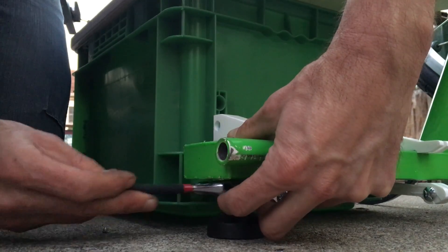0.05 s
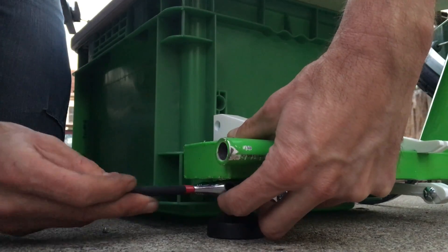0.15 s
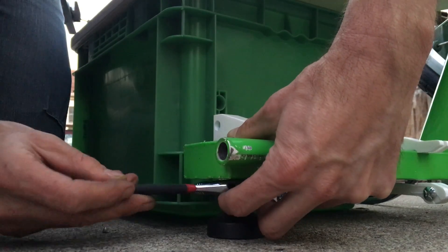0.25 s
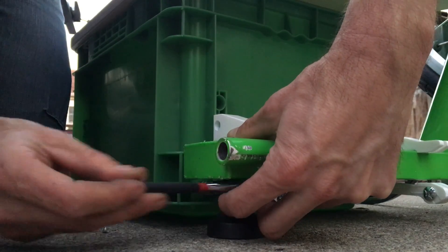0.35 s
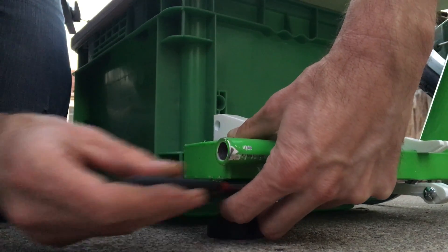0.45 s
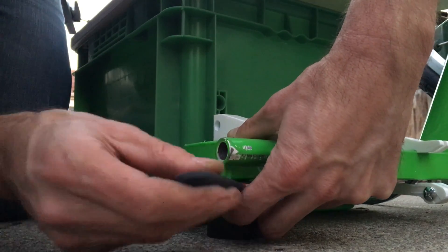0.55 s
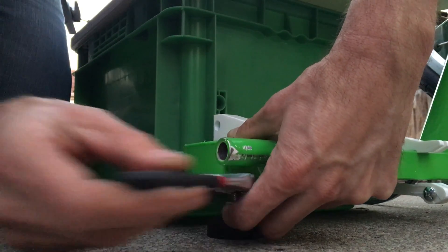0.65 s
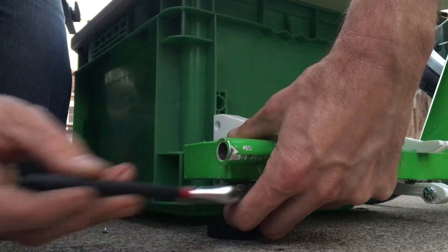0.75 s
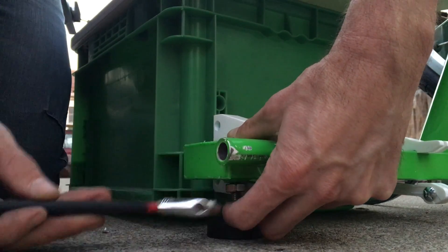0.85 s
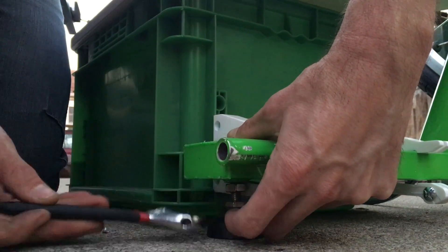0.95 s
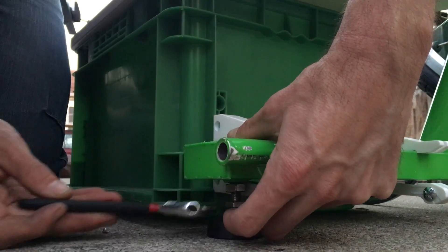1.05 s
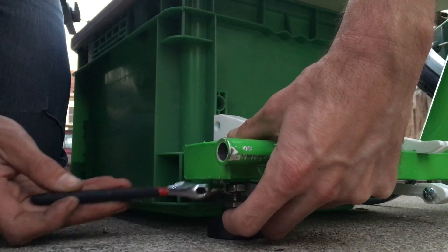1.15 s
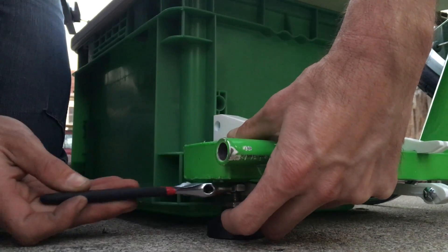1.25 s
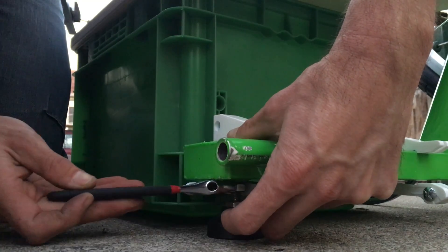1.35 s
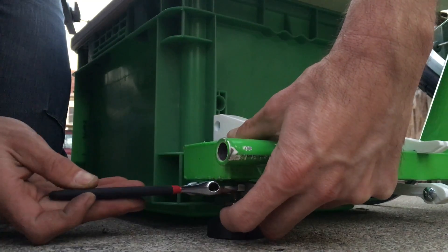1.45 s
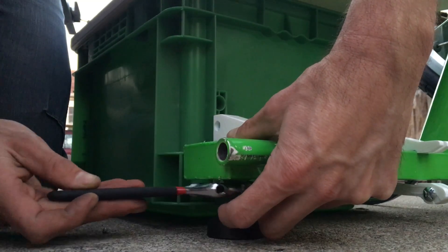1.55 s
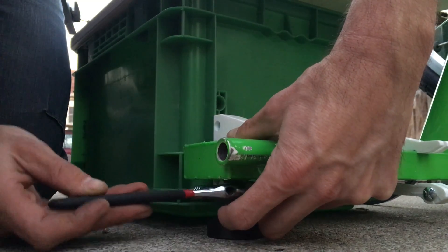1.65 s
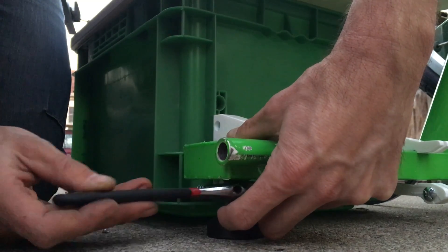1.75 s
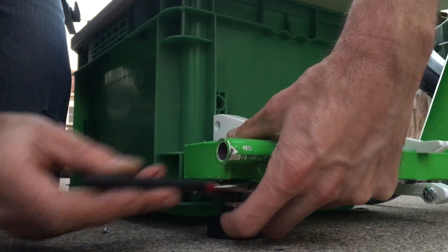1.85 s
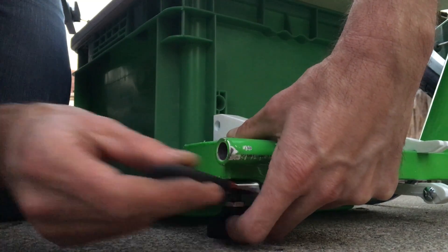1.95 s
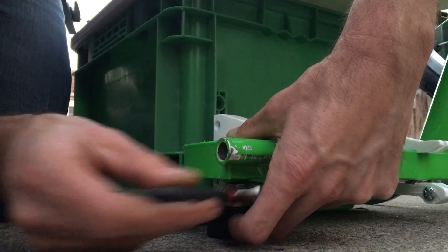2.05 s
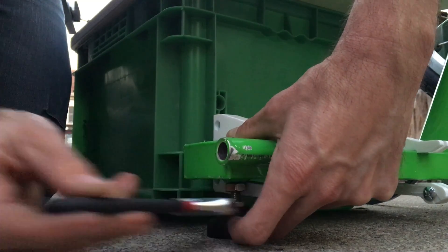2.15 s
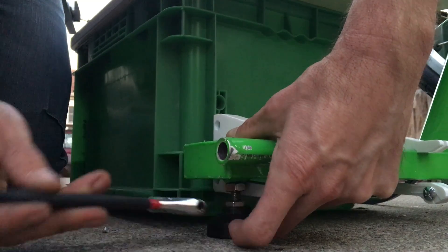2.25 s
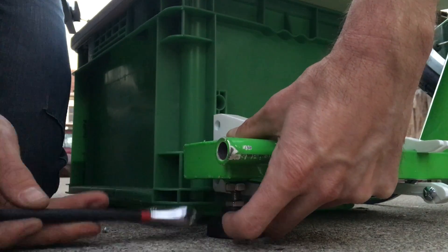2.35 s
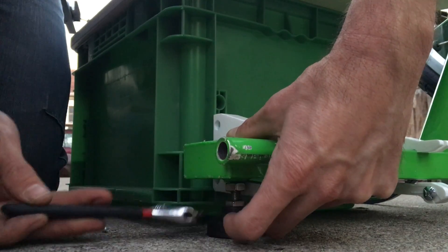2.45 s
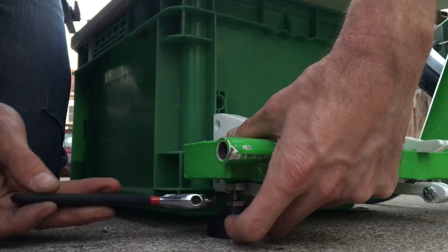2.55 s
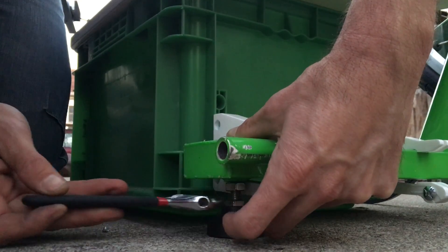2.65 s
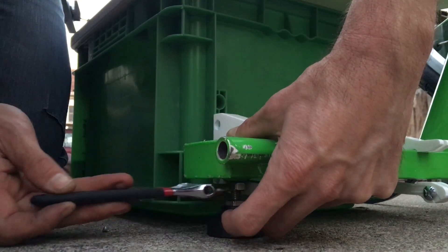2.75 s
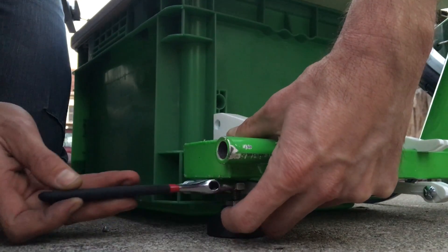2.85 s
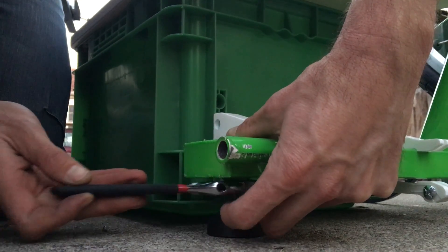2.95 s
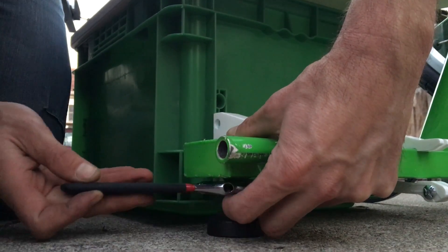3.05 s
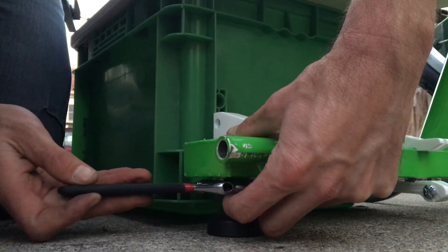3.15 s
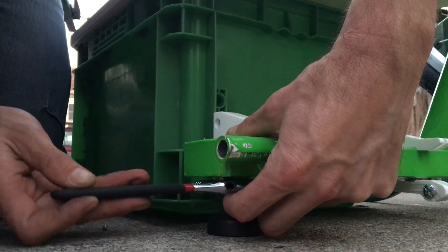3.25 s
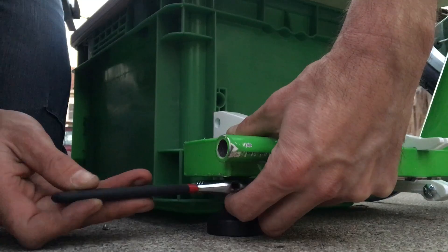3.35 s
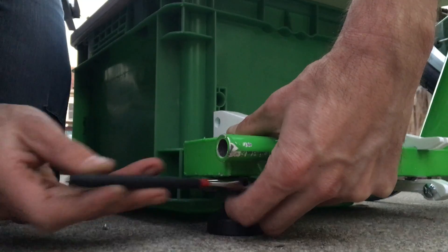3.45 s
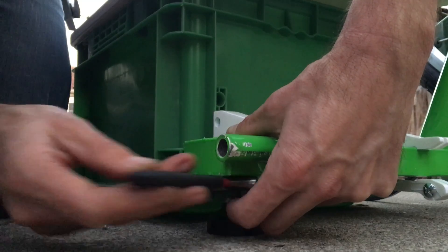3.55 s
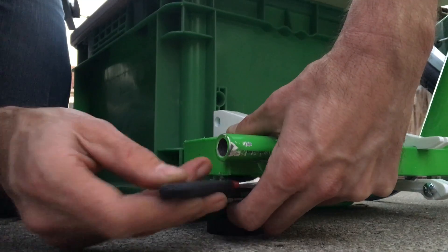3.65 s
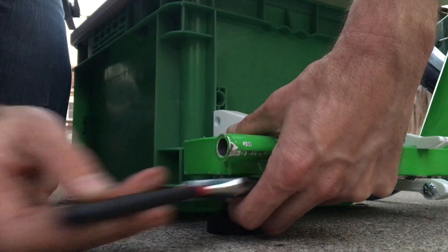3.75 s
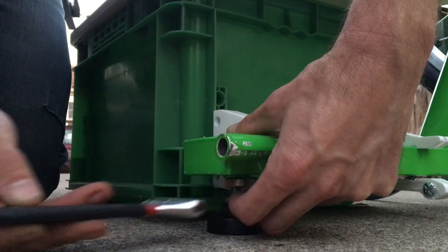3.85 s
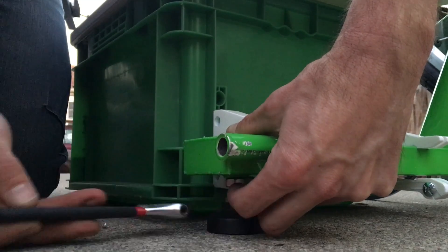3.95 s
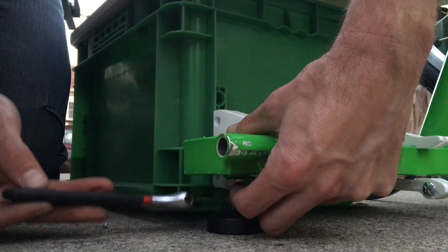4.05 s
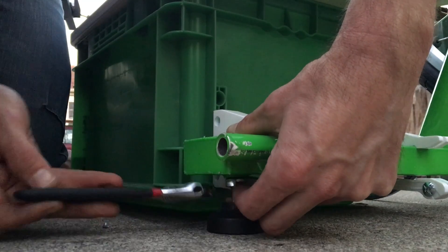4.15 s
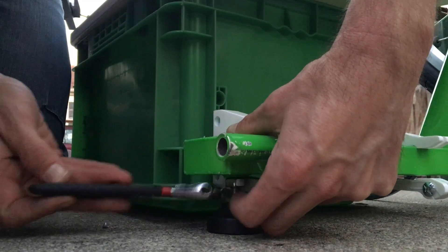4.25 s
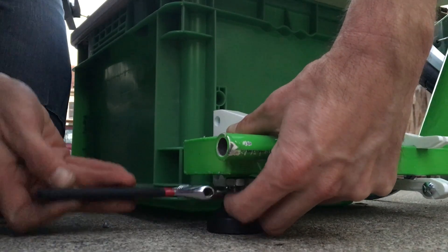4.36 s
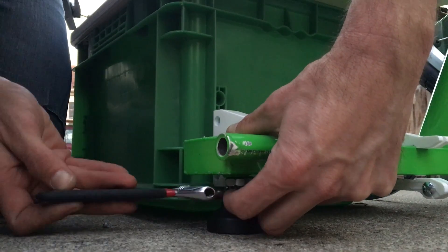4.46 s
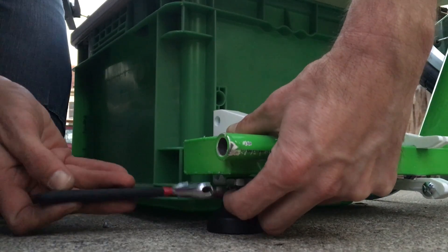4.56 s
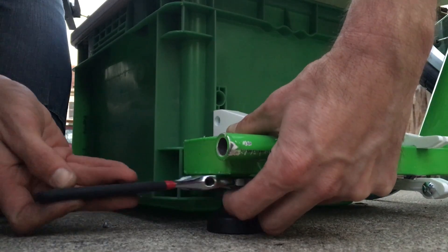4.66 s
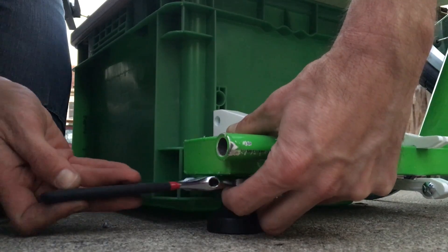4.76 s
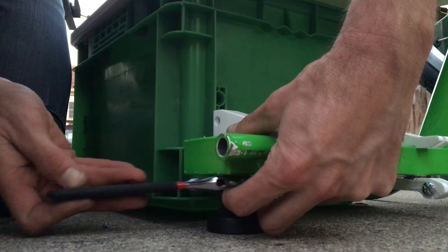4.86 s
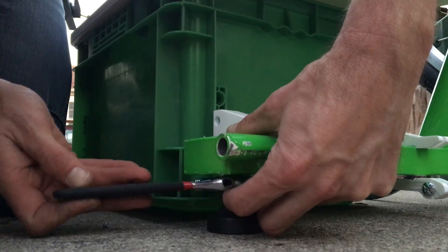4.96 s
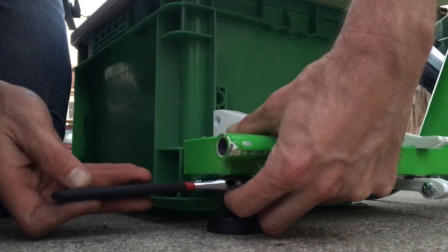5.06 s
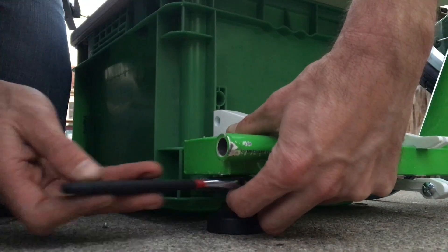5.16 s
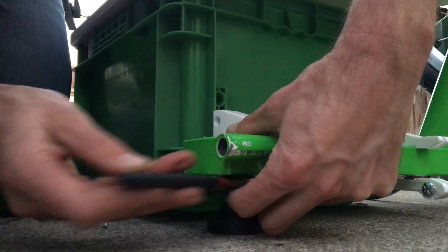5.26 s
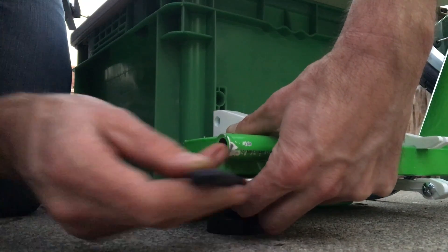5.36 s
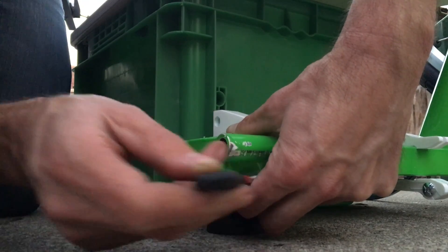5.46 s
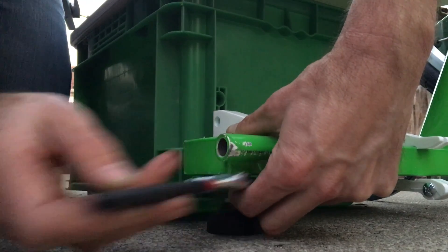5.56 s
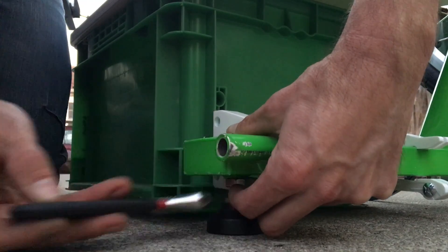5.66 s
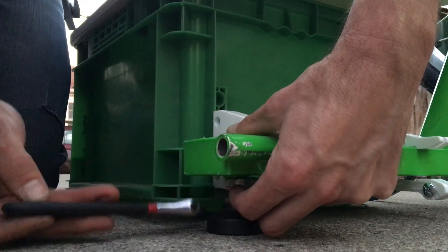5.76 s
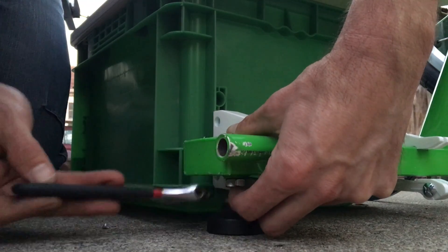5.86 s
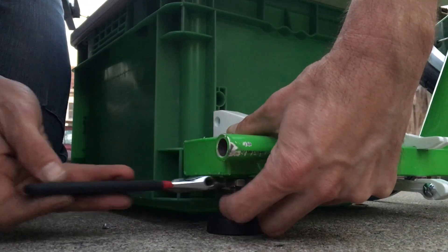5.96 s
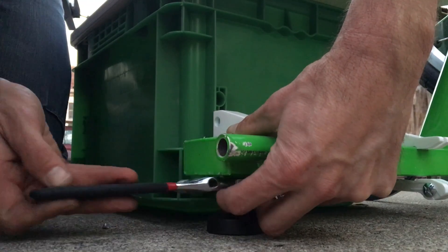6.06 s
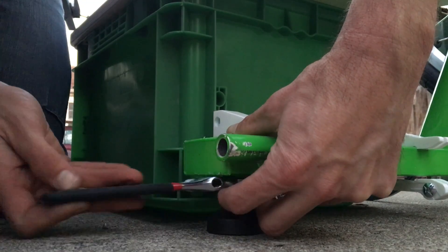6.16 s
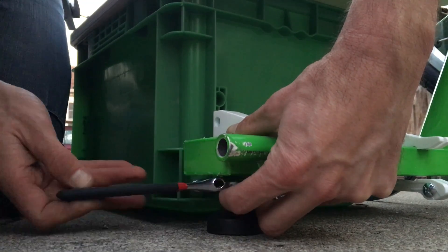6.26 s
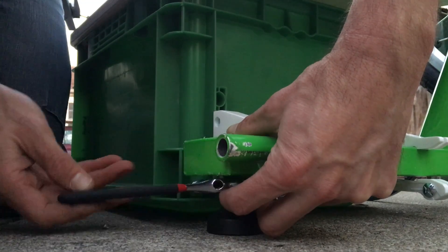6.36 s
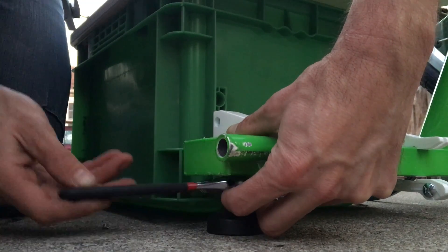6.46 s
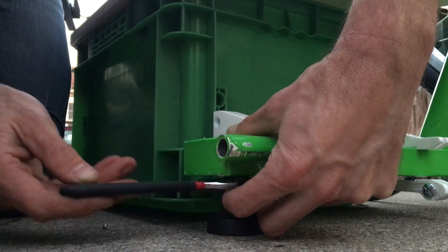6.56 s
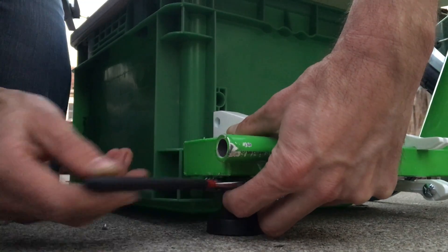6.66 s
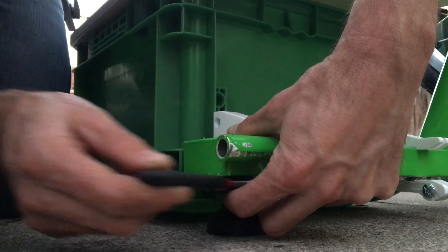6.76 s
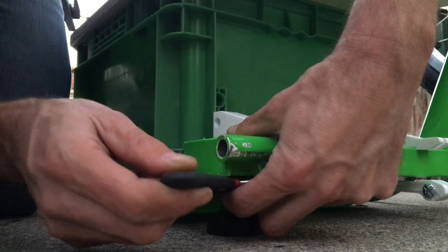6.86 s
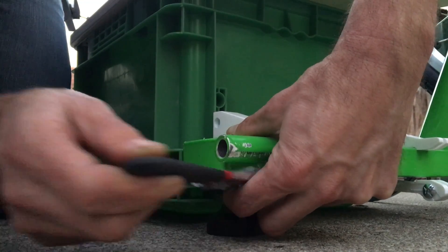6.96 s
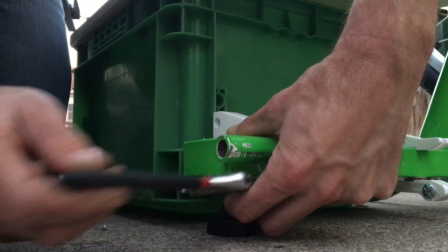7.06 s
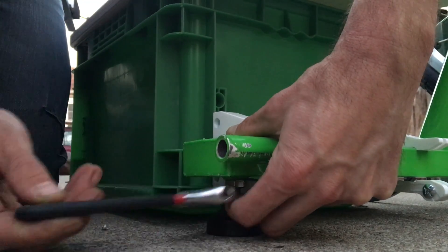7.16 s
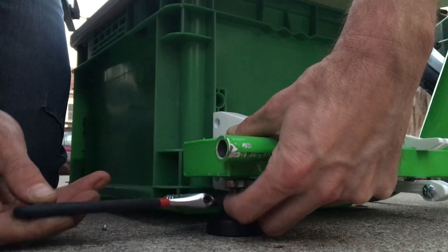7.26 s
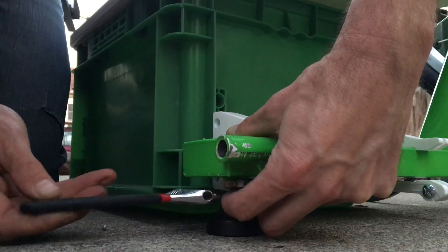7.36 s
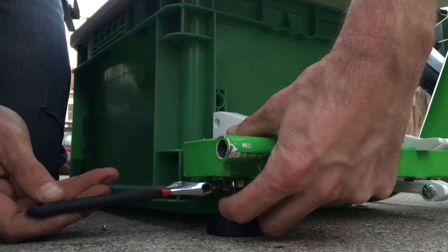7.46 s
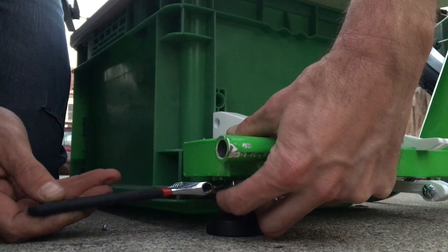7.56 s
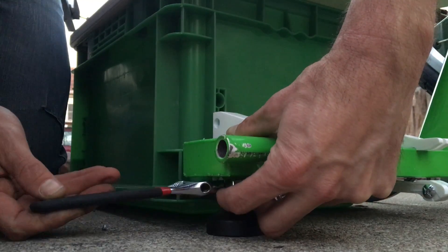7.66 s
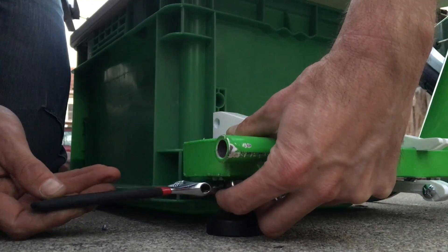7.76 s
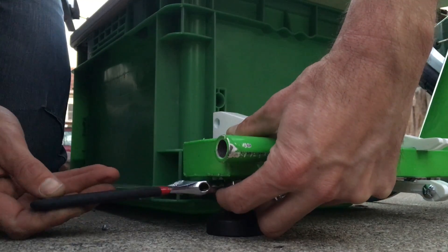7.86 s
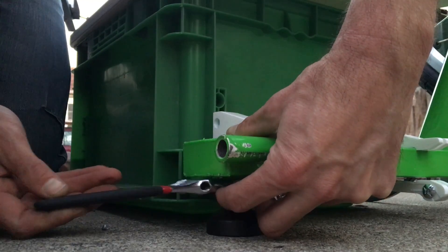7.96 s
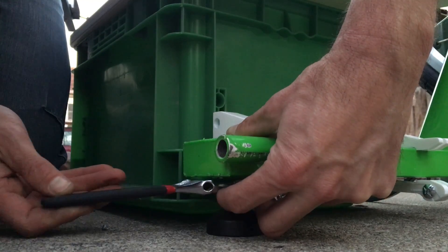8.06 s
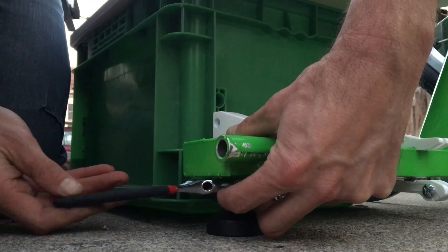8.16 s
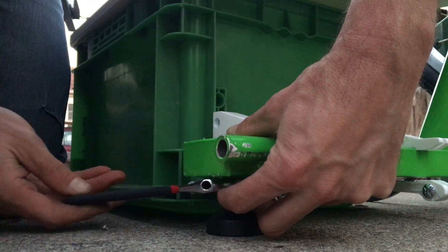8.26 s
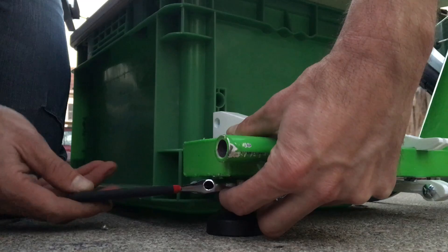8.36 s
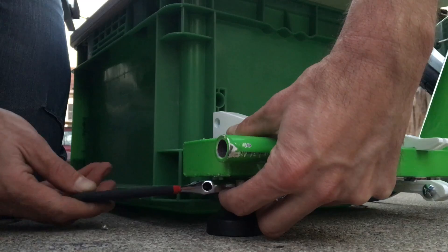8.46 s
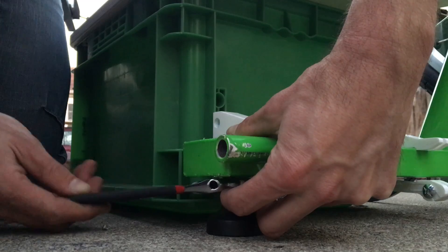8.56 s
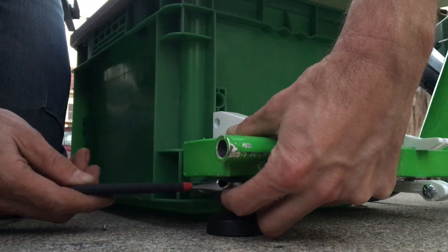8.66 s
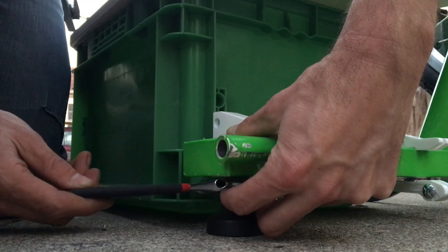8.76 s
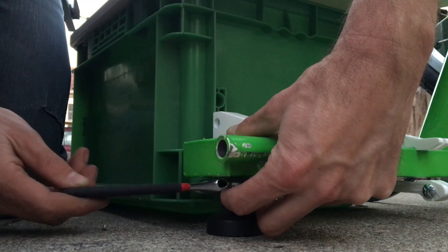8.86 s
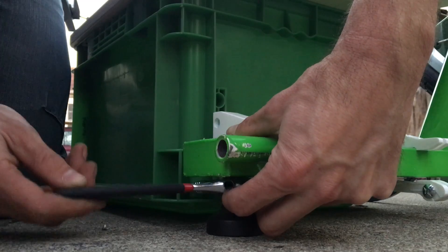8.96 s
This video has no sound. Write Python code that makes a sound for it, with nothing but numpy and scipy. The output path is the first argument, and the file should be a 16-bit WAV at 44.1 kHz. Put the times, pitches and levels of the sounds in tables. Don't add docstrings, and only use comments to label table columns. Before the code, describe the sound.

Outdoors, close and dry, a steel wrench tightens a nut under a metal frame by a hollow plastic crate. Low distant engine drone, soft tyre rush and faint hiss run throughout, the hum swelling slightly around 4.4 and 6-7 s. A light tap and scrape at 0.1 s, then a hard clank at 0.73. Small clicks and rattles at 1.3-1.4, a clack at 1.98, a soft knock and quiet handle rubbing. Clanks and scraping at 2.9-3.3, a tap at 3.57, a sharp clack at 3.78. Metallic tube hits at 4.4-4.5, a hollow clank at 4.7, taps around 5.4. A very loud clack at 6.01 with rattling after, another at 6.55, then the strongest double clank at 6.96-7.05 with boxy crate thump. A skin brush at 7.3, lighter clicks at 7.6 and 8.07-8.4, and small scrapes and ticks near 8.7, ending at about 9 s.

```python
import sys
import numpy as np
from scipy import signal
from scipy.fft import rfft, irfft, next_fast_len
from scipy.io import wavfile
from scipy.ndimage import uniform_filter1d, map_coordinates

SR = 44100
rng = np.random.default_rng(int(sys.argv[2]) if len(sys.argv) > 2 else 0)


def wav_out(sig):
    wavfile.write(sys.argv[1], SR, np.round(np.clip(np.atleast_2d(sig).T, -1, 1) * 32767).astype(np.int16))


def ratio_of_db(decibels):
    return 10 ** (np.asarray(decibels, float) / 20)


N = 397341

RING = 6144
WANDER = 0.012

# time_s, drone_level_db, rush_level_db, firing_pitch_hz
ENGINES = [(0.0, -50, -59.5, 118), (2.2, -47, -58, 112), (3.1, -50, -56.5, 110), (3.76, -46.5, -56.5, 114),
           (4.4, -40, -56, 120), (5.14, -45, -59, 112), (6.1, -42, -57, 106), (6.8, -42, -60, 104),
           (7.3, -47.5, -58, 103), (8.16, -49.5, -57, 100), (9.01, -49, -60, 100)]
# frequency_hz, level_db (per Hz)
TRAFFIC_SPECTRUM = [(15, -40.5), (25, -6), (74, 2.5), (124, 4.5), (177, -3), (266, -12), (457, -23.5),
                    (687, -23), (979, -25.5), (1930, -36.5), (2820, -44.5), (10400, -56.5), (12600, -53),
                    (15200, -68.5), (16500, -80.5)]
RUMBLE_DB, RUMBLE_YIELDS = -45, 0.22

# pitch_hz, level_db, t60_s
WRENCH_MODES = [(2570, -13.5, 0.11), (2970, -15.5, 0.1), (8457, -14, 0.033), (3330, -18, 0.055),
                (8800, -15.5, 0.043), (3570, -5.5, 0.13), (4140, -6.5, 0.053), (3970, -10, 0.05),
                (4333, -3, 0.031), (4746, -7, 0.023), (4570, -6.5, 0.081), (5200, -10, 0.032),
                (5750, -10.5, 0.072), (5720, -10, 0.11), (6000, -17.5, .06), (6640, -7.5, 0.061),
                (7540, -13, 0.06)]
FRAME_MODES = [(1199, -18, 0.21), (1312, -12.5, 0.065), (1544, 0.5, 0.012), (1684, -8, 0.069),
               (1746, -2.5, 0.035), (1970, -14.5, 0.066), (2277, -11, 0.045), (2900, -13.5, 0.017)]
TUBE_MODES = [(1419, 4.5, 0.11), (1355, -3.5, 0.048)]
LID_MODES = [(533, -2, 0.069), (590.5, -2, 0.2), (669.4, -0.5, 0.094), (653.4, -4.5, 0.12),
             (838, -9.5, 0.096), (949, -2, 0.066), (1034.5, -8, 0.14)]
CRATE_MODES = [(164, -14.5, 0.13), (192.2, -8, 0.19), (248, 6, 0.14), (280, -1.5, 0.1), (333.3, -3.5, 0.16),
               (367.8, -13.5, 0.17), (394.4, -6.5, 0.15)]

# frequency_hz, level_db
WRENCH_DENSE = [(1000, -40.5), (2300, -3), (4000, 4), (6500, 2), (8000, -12), (16000, -27.5)]
EDGE_TICK = [(3000, -57), (6000, -25.5), (8500, 2.5), (10500, -2.5), (12500, -1), (16000, -16)]
FRAME_DENSE = [(200, -67), (800, 1), (1150, -5.5), (1750, 0), (2400, -17.5), (3200, -22), (7000, -65.5)]
CRATE_DENSE = [(60, -52), (170, 0), (300, 0.5), (450, -10), (700, -10.5), (1500, -44.5), (4000, -90.5)]
# frequency_hz, level_db
HEAVY_BODY = [(2500, -7), (5000, -17.5), (16000, -60.5)]

# start_s, length_s, jaw_drag_level_db, skin_hiss_level_db, crate_level_db
TURNS = [(-.05, 0.29, -80, -79, -44.5), (.36, 0.46, -67.5, -79, -58.5), (1.56, 0.19, -74, -83, -46),
         (1.8, 0.33, -70.5, -87.5, -76), (2.99, 0.21, -69, -81, -46), (3.28, 0.19, -72, -79, -63),
         (3.55, 0.38, -66.5, -81.5, -66), (4.22, 0.22, -67, -82, -53), (4.4, 0.39, -66, -73.5, -58.5),
         (4.92, .12, -68, -81, -55), (5.08, 0.26, -66.5, -76, -50), (5.34, 0.25, -63, -72, -34),
         (6.08, 0.37, -71, -90, -38.5), (6.55, 0.38, -67.5, -81, -35.5), (7.06, 0.38, -68, -74, -45.5),
         (7.68, 0.2, -72, -87.5, -40.5), (8.33, 0.11, -82, -88, -38.5), (8.8, 0.24, -84, -86, -45)]
# start_s, length_s, wrench_level_db, frame_level_db, crate_level_db
SCRAPES = [(0.097, 0.084, -49, -40.5, -40), (0.566, 0.05, -85, -67, -43.5), (1.293, 0.21, -66, -56, -46.5),
           (1.662, 0.067, -58, -59, -41.5), (2.89, 0.057, -54, -38, -48), (2.96, 0.075, -69, -59, -55),
           (3.07, 0.066, -47, -50, -48), (4.936, 0.084, -81, -49, -43), (5.439, 0.034, -47, -36.5, -47),
           (5.989, 0.016, -59, -59, -49), (6.261, 0.067, -66, -51.5, -71.5),
           (6.512, 0.03, -49.5, -41.5, -33), (6.953, 0.059, -48.5, -51, -27.5), (4.6, 0.023, -84, -59, -57),
           (8.646, 0.12, -62.5, -66.5, -57), (8.64, 0.11, -74, -66, -39.5), (8.688, 0.022, -65, -58, -64.5),
           (8.74, 0.0084, -59, -53, -35.5), (8.765, 0.011, -66.5, -54.5, -41), (1.36, 0.038, -52, -47, -53),
           (3.03, 0.14, -71, -50, -60), (6.965, 0.1, -50.5, -52.5, -33), (0.74, 0.017, -65, -59, -44),
           (4.39, 0.042, -62, -67, -38.5), (8.37, 0.032, -71.5, -56, -52.5)]
REST_JAWS_DB, REST_SKIN_DB, REST_CRATE_DB = -79.5, -85, -58
DRAG_FRAME_DB = 4
# frequency_hz, level_db
PALM_SPECTRUM = [(5000, -20.5), (8000, -4.5), (10500, -3), (13000, -8.5), (16000, -10)]

# start_s, pitch_hz, peak_level_db, t60_s
LOW_SPOTS = [(0.505, 604, -39, .1), (0.607, 904, -32, .05), (1.287, 829, -49, .08), (1.288, 597, -29.5, .3),
             (1.340, 587, -34.5, .4), (1.397, 579, -30, .15), (1.429, 991, -34, .08),
             (2.050, 829, -38.5, .08), (2.885, 663, -22.5, .08), (2.945, 584, -29, .2),
             (3.140, 380, -28, .1), (3.317, 990, -32, .06), (3.572, 904, -25.5, .06),
             (3.778, 880, -10, .025), (4.72, 323.7, -19.5, .12), (4.719, 601, -27, .12),
             (5.388, 840, -27, .08), (5.388, 587, -32, .1), (5.522, 322, -21.5, .12),
             (5.521, 920, -29.5, .08), (6.015, 341, -24, .12), (6.017, 575, -22.5, .2),
             (6.014, 970, -28, .08), (6.082, 386, -38.5, .12), (6.083, 915, -30.5, .06),
             (6.178, 656.6, -24, .1), (6.193, 578.7, -27.5, .12), (6.295, 996, -39, .07),
             (6.325, 680, -37, .15), (6.525, 666, -30, .15), (6.961, 800, -23, .07),
             (7.009, 310, -13.5, .12), (7.008, 900, -17, .07), (7.047, 237, -21, .14),
             (7.585, 609, -32.5, .1), (7.585, 1000, -29, .07), (7.616, 398, -32.5, .1),
             (7.616, 926, -34.5, .07), (0.733, 387, -26.5, 0.14), (4.384, 392, -21, .1),
             (4.512, 591, -27, 0.14), (4.602, 580, -42, .15), (4.850, 584, -37, .12),
             (8.392, 686, -40, 0.13), (8.744, 683, -34.5, .08), (8.220, 251, -20.5, .12)]
# start_s, pitch_hz, peak_level_db, t60_s
HIGH_SPOTS = [(0.732, 1680, -11.5, 0.028), (1.286, 2270, -26, 0.06), (1.287, 1355, -38, 0.11),
              (1.400, 1407, -33, 0.16), (1.429, 4800, -34, 0.071), (1.979, 1790, -21, 0.05),
              (1.979, 4129, -22.5, 0.047), (2.885, 1306, -29, 0.076), (3.031, 1418, -52, .5),
              (3.141, 5820, -42.5, 0.09), (0.650, 5900, -40.5, .07), (3.573, 2370, -37, 0.055),
              (3.779, 4300, -45.5, 0.26), (3.775, 4560, -22.5, .05), (3.776, 8457, -34, .067),
              (4.507, 1920, -26.5, 0.06), (4.719, 1750, -22, 0.029), (6.014, 1768, -15, 0.053),
              (6.012, 4140, -16.5, 0.055), (6.014, 3583, -29, 0.11), (6.083, 1680, -31.5, .06),
              (8.069, 5580, -38, 0.098), (6.083, 3640, -42.5, 0.14), (6.195, 1970, -41, 0.16),
              (6.199, 1425, -51.5, 0.35), (6.295, 5950, -28.5, 0.05), (8.069, 8800, -31, 0.034),
              (6.330, 1676, -31.5, 0.074), (6.551, 1420, -21, 0.12), (6.552, 1697, -24, 0.055),
              (6.552, 3560, -34.5, 0.12), (6.961, 4330, -13, 0.046), (6.961, 4620, -17, 0.053),
              (7.009, 2400, -20, 0.062), (7.049, 1680, -24, 0.056), (7.585, 1805, -22.5, .05),
              (7.615, 2760, -30.5, 0.064), (8.069, 2004, -32, 0.06), (8.392, 3600, -41, 0.062),
              (4.378, 1660, -28, .05), (4.655, 1950, -47, 0.073), (4.719, 2570, -38, 0.15),
              (8.069, 2920, -54, .25), (8.148, 4510, -40, 0.042), (8.220, 2720, -35, 0.03),
              (2.050, 2220, -37, 0.064), (8.100, 1430, -55, 0.37), (6.016, 2570, -28.5, 0.17),
              (6.961, 8500, -21.5, .05),
              (0.142, 3601, -28, 0.052), (0.732, 3790, -23, .05), (0.732, 5850, -30, 0.057),
             (1.979, 2277, -28.5, .06), (2.885, 4802, -25, 0.054), (3.297, 6420, -38.5, .05),
             (4.378, 1965, -37.5, .15), (4.378, 3090, -24.5, 0.069), (5.453, 4800, -30, 0.065),
             (6.014, 4510, -25.5, .06), (6.014, 6503, -25, 0.043), (6.961, 5300, -28.5, .05),
             (7.008, 2680, -25.5, 0.057), (3.776, 5604, -34, 0.071), (0.105, 1418, -37, 0.32)]

# start_s, wrench_peak_level_db, then over the wrench crate_db, tube_db, edge_db
TUBE_HITS = [(0.1416, -27, 5.5, -2, -39), (1.315, -39, 10.5, 9, -8), (1.3965, -51, 25, 17.5, -20),
             (2.9406, -29.5, 1, -1.5, -10.5), (3.5721, -30, -23, -4.5, -16), (4.3773, -16, -5.5, 3.5, -4),
             (4.5047, -26.5, -4, -6.5, -4), (4.8232, -45, 17.5, 5.5, -1), (4.842, -35.5, -8, -7, -24),
             (4.9754, -39.5, 2, 0.5, -27), (5.386, -32.5, 1.5, -4, -34), (6.0814, -24, -1.5, -5.5, -17),
             (6.1924, -29, 2, -1, -7), (6.283, -37.5, -24.5, 0, -26), (6.2944, -25.5, -10.5, -25, -13.5),
             (6.329, -35, -3.5, -5, -20), (7.584, -40, 17.5, 15, -21.5), (8.0687, -24, 3.5, 3.5, -2.5),
             (8.2181, -41.5, 15, 2.5, -10), (8.3923, -32.5, 0, -9, -46)]
# start_s, wrench_peak_level_db, then over the wrench crate_db, frame_db, tube_db
KNOCKS = [(0.5054, -57, 19.3, 17.5, 1), (0.6098, -64.5, 35, 11, -21), (2.05, -52.5, 21.7, 19.5, -11),
          (3.032, -46.5, 2.6, -3, 2), (3.2617, -56, 22.3, 10.5, 15), (3.633, -53.5, 13, 18, -2),
          (4.655, -54.5, 4, 7, 13), (5.3414, -56, 22, 19.5, -16), (6.6422, -50, 8.5, 6, -5.5),
          (6.824, -77.5, 44, 6, 10), (7.8078, -50, 19, 11, 10), (7.8812, -59, 16, 10, 9.5),
          (7.964, -48.5, 11, 3, 4.5), (8.2919, -58.5, 12, -13.5, 13.5), (8.3087, -50.5, 12.6, -8, 5),
          (8.6013, -60, 21, -7, -5.5), (8.991, -72, 36, 9, -9.5)]
# start_s, wrench_peak_level_db, then over the wrench crate_db, frame_db, edge_db
CLANKS = [(0.6404, -31, 1.5, -10.5, -7), (0.7318, -15.5, -1.5, -6.5, -5), (1.286, -28, -6, -0.5, -17),
          (1.4292, -27, -0.5, -10, -18), (1.9786, -19.5, -3.5, -3, -16), (2.8847, -21, -5, -3.5, -7.5),
          (3.1109, -35, 3.5, -3.5, -30), (3.14, -30, -1, 4.5, -16), (3.296, -32, -2.5, -14.5, -21),
          (3.7755, -13, -13.5, -12, -17), (4.327, -35.5, 13.5, -13, -10), (4.7182, -19.5, -7.5, -1.5, -16),
          (5.442, -36, 8, -6, -14), (5.452, -23.5, -1.5, -16, -5.5), (5.52, -30, -7, 3, -36),
          (6.0135, -5.5, -19.5, -14, -37.5), (6.176, -22.5, -6.5, -7.5, -15), (6.551, -12, -3.5, -9.5, -11),
          (6.5897, -37, 10, 5, -17), (6.9602, -4.5, -15.5, -14, -11.5), (7.0063, -12, -15, -3.5, -22.5),
          (7.0465, -29, 6.5, -1, -4.5), (7.616, -31, 1, 2.5, -25), (8.147, -38.5, 1.5, -3.5, -33)]
# start_s, wrench_peak_level_db, then over the wrench bodies_db, edge_db
TICKS = [(0.938, -70, 4, 15), (0.648, -39, -17, -11), (1.4, -44, -10, -3), (1.419, -48.5, -10, -9),
         (6.945, -51.5, -10.5, -8), (8.649, -54, -5, -29), (1.34, -43, 0, -20), (1.3708, -45, 7, -17),
         (1.703, -45.5, 6.5, -11), (2.138, -54, 10.5, -16), (3.001, -53, -1, -22), (3.073, -60, 9, -17),
         (3.412, -54, -14, 1), (4.993, -39.5, -14, -20), (6.236, -44.5, 6.5, -23), (6.259, -45, -14, -23),
         (6.535, -28.5, -15, -21), (6.8685, -48.5, 6.5, -10), (7.303, -33.5, -15, -5),
         (8.665, -51, 12, -29), (8.722, -48.5, -11, -18)]
CLANK_TUBE_DB, HIT_FRAME_DB = -11.5, -1
TICK_FRAME_DB, TICK_TUBE_DB, KNOCK_EDGE_DB = -11.5, -14, -19
# start_s, level_db
LID_CHANGES = [(0.7316, -17), (3.1104, -6), (6.551, -7), (7.0475, -10.5), (1.9787, -5), (3.7752, -10.5),
               (8.0687, -1), (4.3776, -4.5), (7.584, 0.5), (5.452, -13), (8.2186, 4.5)]

# start_s, length_s, level_db
BRUSHES = [
    (1.084, 0.031, -68),
    (1.809, 0.089, -63.5),
    (2.157, 0.09, -63.5),
    (2.255, 0.011, -69),
    (2.54, 0.037, -67.5),
    (3.873, 0.037, -65),
    (4.02, 0.075, -60),
    (5.814, 0.065, -61),
    (6.895, 0.0083, -65),
    (7.287, 0.049, -50),
]
# frequency_hz, level_db (per Hz)
SKIN_SPECTRUM = [(1470, -20), (2500, -4.5), (3080, -8), (6060, -10), (8600, -13), (12900, -8.5),
                 (16000, -16)]
# frequency_hz, level_db
MICROPHONE = [(20, -19.5), (40, 0.5), (9600, -2.5), (10500, -8.5), (11500, -2.5), (15500, -3), (16400, -11),
              (17000, -48)]


def unit(x):
    return x / np.sqrt(np.mean(x ** 2) + 1e-20)


def peak_one(x):
    return x / (np.abs(x).max(axis=-1, keepdims=True) + 1e-12)


def curves(rows):
    s, *cols = np.transpose(rows)
    return [np.interp(np.arange(N) / SR, s, c) for c in cols]


def coloured(x, points):
    m = next_fast_len(x.shape[-1])
    hz, db = np.transpose(points)
    log_bins = np.log(np.fft.rfftfreq(m, 1 / SR) + 1)
    gain = ratio_of_db(np.interp(log_bins, np.log(hz), db))
    return irfft(rfft(x, m) * gain, m)[..., :x.shape[-1]]


def wobble(rate):
    knots = rng.standard_normal(int(N * rate / SR) + 4)
    return map_coordinates(knots, [np.arange(N) * rate / SR])


def stroke(s, length):
    t = np.arange(N) / SR
    return np.exp(-((t - s - length / 2) / (length / 2)) ** 4)


def pressed(rows):
    return sum(ratio_of_db(np.array(row[2:]))[:, None] * stroke(*row[:2]) for row in rows)


def swell(t, rise):
    return 1 - np.exp(-(t / rise) ** 2)


def smooth_rows(count, size):
    return unit(uniform_filter1d(rng.standard_normal((count, RING)), size=size, axis=1))


def ringing(modes, count, spread_db, rise):
    hz, db, t60 = np.transpose(modes)[:, :, None]
    t = np.arange(RING) / SR
    wander = WANDER * hz / SR * np.cumsum(smooth_rows(len(modes), size=150), axis=1)
    decay = ratio_of_db(db - 60 * t / t60)
    shapes = decay * np.sin(2 * np.pi * (hz * t + wander)) * swell(t, rise)
    draw = rng.standard_normal((count, 2, len(modes)))
    strengths = np.sign(draw[:, 0]) * ratio_of_db(spread_db * draw[:, 1])
    return strengths @ shapes


def lumpy(count, depth_db, size):
    humps = unit(uniform_filter1d(rng.standard_normal((count, RING // 2 + 1)), size=size, axis=1))
    return irfft(rfft(rng.standard_normal((count, RING))) * ratio_of_db(depth_db * humps), RING)


def dense(count, colour, fast, slow, tail_db, rise):
    t = np.arange(RING) / SR
    decay = ratio_of_db(-60 * t / fast) + ratio_of_db(tail_db - 60 * t / slow)
    noise = coloured(lumpy(count, depth_db=2.5, size=40), colour)
    return peak_one(noise * decay * swell(t, rise))


def placed(s, sounds):
    where = np.round(s * SR).astype(int) + np.arange(RING)
    fade = np.hanning(2 * RING)[RING:] ** 0.5
    return np.bincount(where.ravel(), (sounds * fade).ravel(), N + RING)[:N]


def traffic_part(gate):
    return unit(coloured(coloured(rng.standard_normal(N), TRAFFIC_SPECTRUM), gate))


def traffic():
    drone_db, rush_db, firing_hz = curves(ENGINES)
    rumble_db = RUMBLE_DB - RUMBLE_YIELDS * (drone_db - drone_db.mean())
    rumble = traffic_part([(85, -7.0), (130, -16.5), (300, -32.0)]) * ratio_of_db(rumble_db + 3.2 * wobble(8.7))
    drone = traffic_part([(70, -32.5), (105, 0.5), (150, -1.5), (300, -32.5)])
    drone = drone * ratio_of_db(drone_db + 0.9 * wobble(5))
    phase = 2 * np.pi * np.cumsum(firing_hz) / SR + 1.3 * wobble(8.7)
    firing = np.sin(phase) * ratio_of_db(drone_db - 5 + 3.9 * wobble(4))
    rush = traffic_part([(120, -24.0), (240, -7.0), (1800, -6.0), (6000, -17.5)])
    rush = rush * ratio_of_db(rush_db + 9 + 1.4 * wobble(2.5))
    hiss = ratio_of_db(-71.0) * traffic_part([(1800, -30.0), (4000, -4.0)])
    return rumble + drone + firing + rush + hiss


def slip():
    return unit(rng.standard_normal(N) ** 3 * ratio_of_db(2.5 * wobble(70)))


def rubbed(modes, press):
    body = unit(ringing(modes, count=1, spread_db=1.5, rise=0.00035)[0])
    return signal.fftconvolve(press * slip(), body)[:N]


def drag():
    rest = ratio_of_db(np.array([[REST_JAWS_DB], [REST_SKIN_DB], [REST_CRATE_DB]]))
    jaws, skin, crate = pressed(TURNS) + rest
    light = np.array([jaws, jaws * ratio_of_db(DRAG_FRAME_DB - 7.0), crate * ratio_of_db(-10.5)])
    on_wrench, on_frame, on_crate = light + pressed(SCRAPES)
    bodies = ratio_of_db(-6) * rubbed(WRENCH_MODES, on_wrench - 0.67 * jaws)
    bodies += ratio_of_db(-3.0) * rubbed(FRAME_MODES + TUBE_MODES, on_frame)
    bodies += rubbed(CRATE_MODES, on_crate)
    bodies += ratio_of_db(0.5) * rubbed(LID_MODES, np.sqrt(on_crate * on_frame))
    grit = (on_wrench + 0.26 * jaws) * ratio_of_db(-6.0) * unit(coloured(slip(), WRENCH_DENSE))
    grit += on_frame * ratio_of_db(-7.0) * unit(coloured(slip(), FRAME_DENSE))
    palm = skin * ratio_of_db(1.5 + 1.9 * wobble(23)) * unit(coloured(rng.standard_normal(N), PALM_SPECTRUM))
    return bodies / np.sqrt(RING) + grit + palm


def spots():
    s, hz, db, t60 = np.transpose(LOW_SPOTS + HIGH_SPOTS)[:, :, None]
    t = np.arange(RING) / SR
    flutter = smooth_rows(len(s), size=200)
    phase = 2 * np.pi * hz * t + np.sqrt(hz / 4000) * flutter[:, ::-1]
    decay = ratio_of_db(db - 60 * t / t60 + 3.3 * flutter)
    return placed(s, decay * np.sin(phase) * swell(t, 2.5 / hz + 0.0012))


def touches():
    clanks = [(s, w, c, f, f + CLANK_TUBE_DB, e) for s, w, c, f, e in CLANKS]
    hits = [(s, w, c, u + HIT_FRAME_DB, u, e) for s, w, c, u, e in TUBE_HITS]
    ticks = [(s, w, b, b + TICK_FRAME_DB, b + TICK_TUBE_DB, e) for s, w, b, e in TICKS]
    knocks = [(s, w, c, f, u, KNOCK_EDGE_DB) for s, w, c, f, u in KNOCKS]
    return sorted(clanks + hits + ticks + knocks)


def contacts():
    s, peak_db, crate_db, frame_db, tube_db, edge_db = np.transpose(touches())[:, :, None]
    count, burst = len(s), RING // 8
    t = np.arange(RING) / SR
    force = rng.standard_normal((count, burst)) ** 3 * ratio_of_db(-60 * t[:burst] / 0.012)
    force[:, 0] = 6
    loose = smooth_rows(count, size=120) * swell(t, 0.012)

    def struck(body):
        return peak_one(signal.fftconvolve(force, body, axes=1)[:, :RING])

    def pushed(modes, spread_db, rise):
        return struck(coloured(ringing(modes, count, spread_db, rise), HEAVY_BODY))

    wrench = struck(ringing(WRENCH_MODES, count, spread_db=2.5, rise=0.00022)) * ratio_of_db(3.5 * loose)
    wrench += ratio_of_db(4.5) * dense(count, WRENCH_DENSE, 0.029, 0.12, -13.5, 0.00037)
    edge = dense(count, EDGE_TICK, 0.025, 0.088, -20.0, 0.00051)
    frame = pushed(FRAME_MODES, spread_db=4, rise=0.0015) * ratio_of_db(3.8 * loose)
    frame += ratio_of_db(3.5) * dense(count, FRAME_DENSE, 0.04, 0.19, -18.0, 0.0033)
    tube = pushed(TUBE_MODES, spread_db=5.5, rise=0.0044) * ratio_of_db(3.4 * loose)
    lid = pushed(LID_MODES, spread_db=4.5, rise=0.006)
    crate = pushed(CRATE_MODES, spread_db=2.5, rise=0.0088)
    crate += ratio_of_db(-3) * dense(count, CRATE_DENSE, 0.059, 0.34, -1.5, 0.0023)

    lid_change_db = sum(db * (np.abs(s - at) < 1 / 200) for at, db in LID_CHANGES)
    total = peak_one(wrench) + ratio_of_db(edge_db + 4.0) * edge
    total += ratio_of_db(frame_db + 6.0) * peak_one(frame)
    total += ratio_of_db((crate_db + frame_db) / 2 + lid_change_db - 2.5) * lid
    total += ratio_of_db(tube_db + 1.0) * tube
    total += ratio_of_db(crate_db + 3.0) * peak_one(crate)
    return placed(s, ratio_of_db(peak_db) * total)


def brush():
    strokes = sum(ratio_of_db(db) * stroke(s, length) for s, length, db in BRUSHES)
    hiss = unit(coloured(rng.standard_normal(N), SKIN_SPECTRUM))
    return strokes * ratio_of_db(2.6 * wobble(170)) * hiss


def scene():
    return (traffic() + drag() + spots() + contacts() + brush())[None]


def top_cut(x):
    return signal.sosfilt(signal.butter(12, 16850, fs=SR, output="sos"), x)


def record(dry):
    mix = coloured(dry, MICROPHONE)
    return top_cut(mix)


dry = scene()
out = record(dry)
wav_out(out)
```